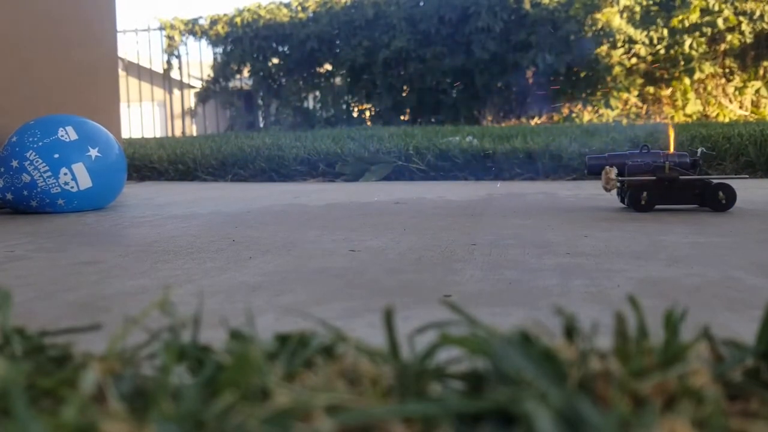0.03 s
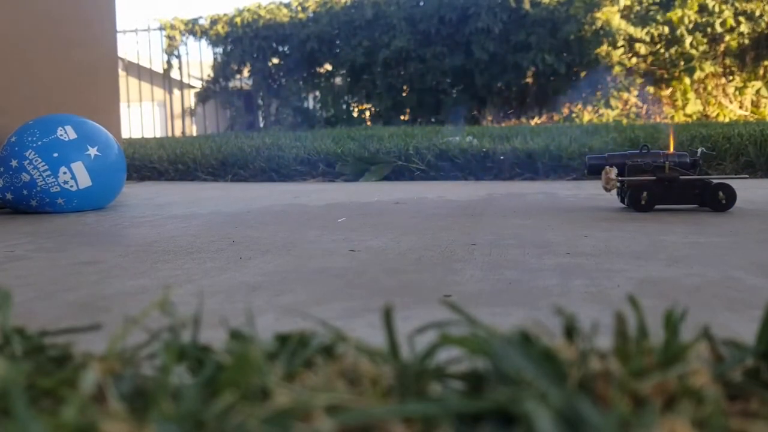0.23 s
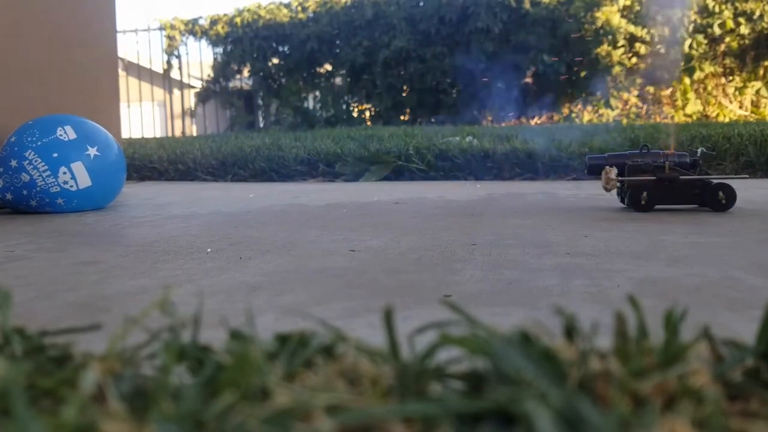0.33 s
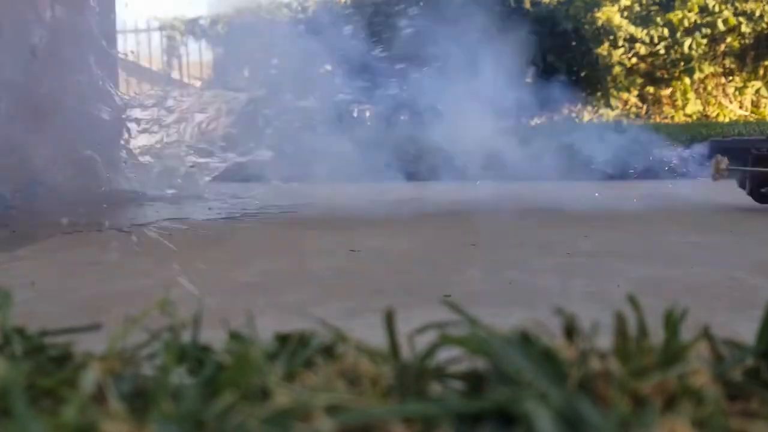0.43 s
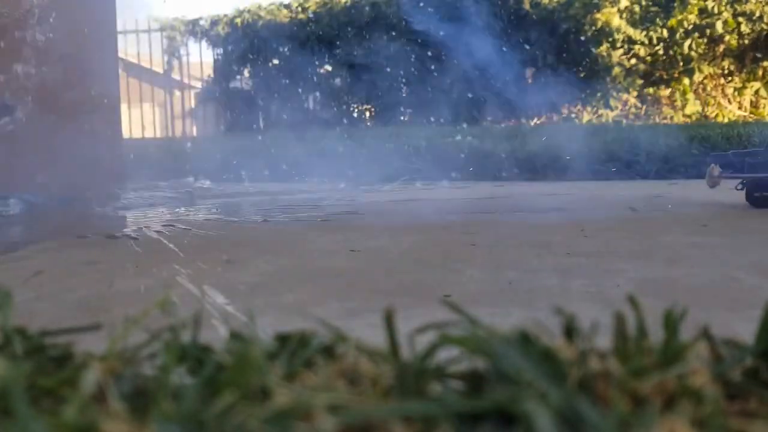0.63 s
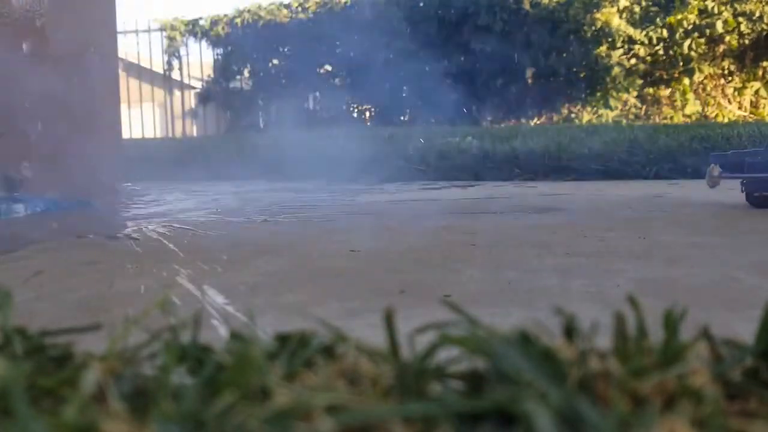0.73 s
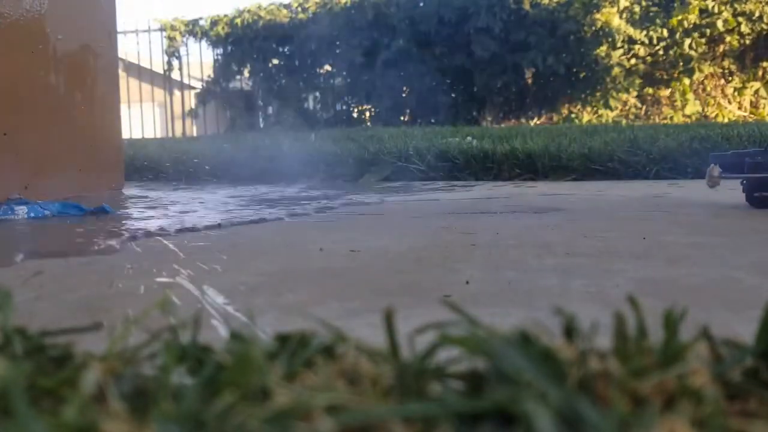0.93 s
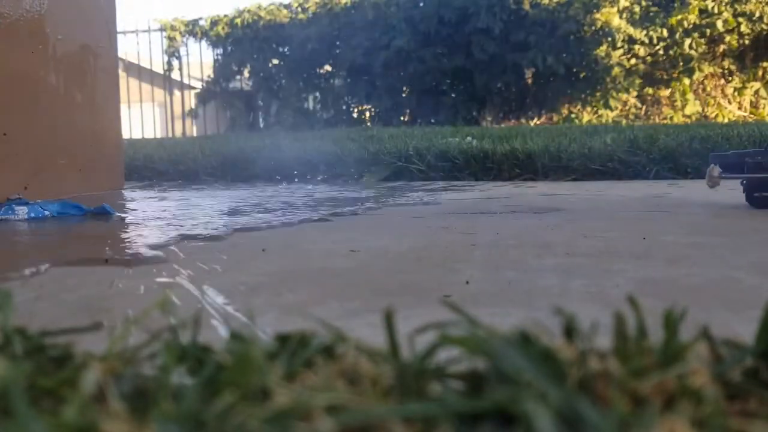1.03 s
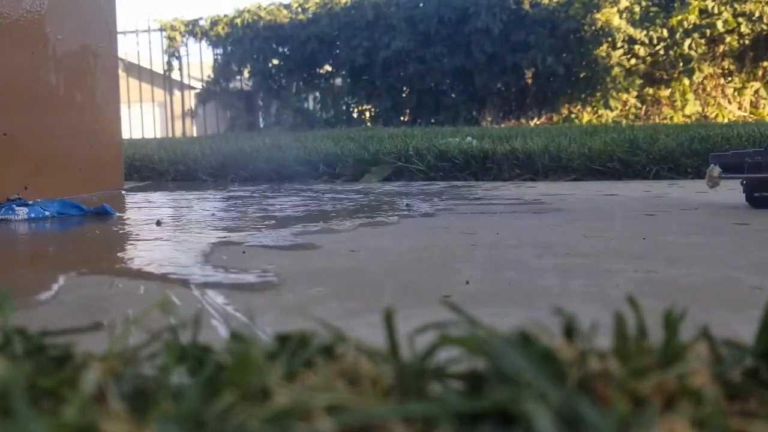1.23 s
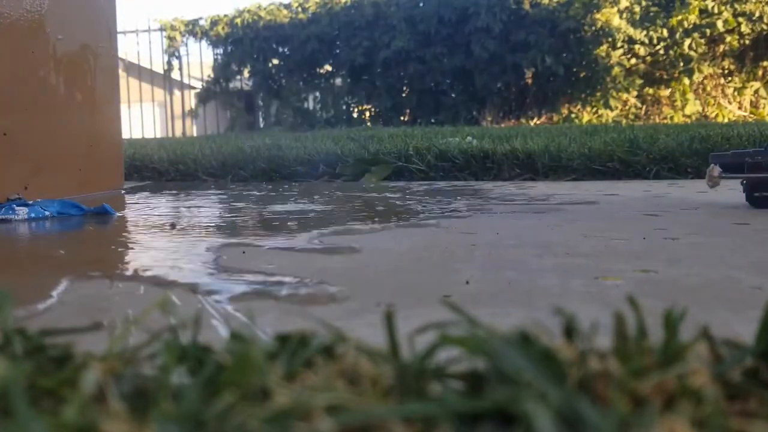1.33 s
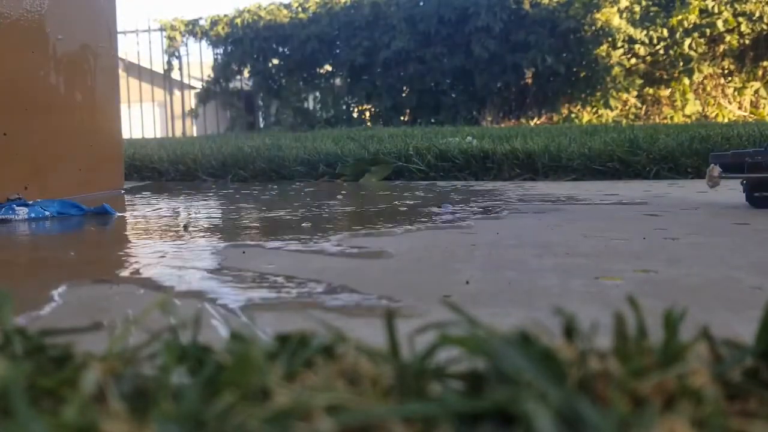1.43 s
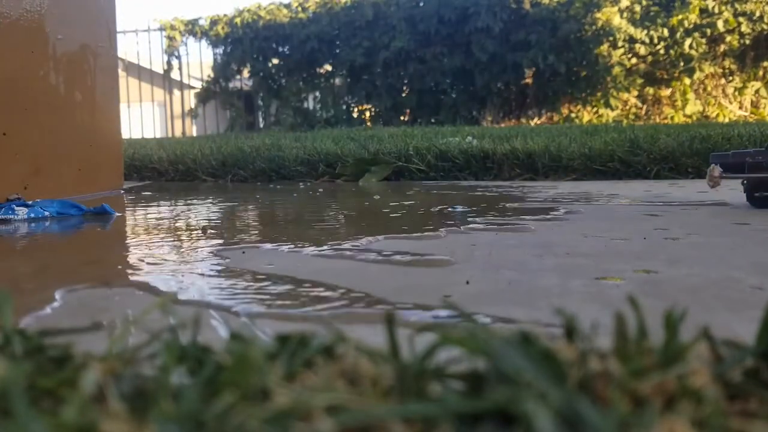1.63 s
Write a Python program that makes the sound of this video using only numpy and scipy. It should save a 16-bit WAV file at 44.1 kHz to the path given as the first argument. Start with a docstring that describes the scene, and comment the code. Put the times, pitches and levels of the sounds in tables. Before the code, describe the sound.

A small cannon bangs outdoors after a brief fuse hiss, then water spatters.

```python
"""A fuse hisses, then a small cannon goes off on a patio with a crack that overloads the microphone.
The shot bursts a water balloon. The yard rings, houses throw the boom back, and it rolls away
while water spatters on the concrete and two drops hit the microphone.
A soft rush with a low tone swells at the end."""
import sys
import numpy as np
from scipy import signal
from scipy.fft import rfft, irfft
from scipy.io import wavfile

SR = 44100
rng = np.random.default_rng(int(sys.argv[2]) if len(sys.argv) > 2 else 0)


def unload_audio(sound):
    """Save the sound as a 16-bit wav file, at the path given as the first command line argument."""
    columns = np.transpose(np.atleast_2d(sound))
    # keep every value between -1 and 1, then stretch to whole-number steps
    steps = np.round(np.clip(columns, -1, 1) * 32767)
    wavfile.write(sys.argv[1], SR, steps.astype(np.int16))


N = 74970
T = np.arange(N) / SR
SHOT_S, LEFT_LAG_S = .2239, .00025
YARD_PAN_DB, FAR_PAN_DB = -0.7, -1.5

# colour of the shot's cracks (frequency [Hz], level [dB])
CRACK_SPECTRUM = [(60, -14), (300, 9), (800, 6), (1500, 4), (2200, -0.5), (3000, 2.5), (4300, -7),
                  (7000, -11.5), (15000, -7.5)]
# colour of the finest droplets and the closing fizz (frequency [Hz], level [dB])
MIST_SPECTRUM = [(2500, -23), (5000, -12), (7500, -13), (10500, 1), (15500, -5.5)]
# stereo image of the yard: centred bass, wide treble (frequency [Hz], left-right correlation)
YARD_STEREO = [(60, .98), (150, .98), (300, .95), (640, .68), (1400, -.05), (3000, .05), (15000, .05)]
# stereo image of air and water (frequency [Hz], left-right correlation)
AIR_STEREO = [(60, .75), (290, 1), (640, 0.74), (1400, 0.0048), (3000, 0.025), (15000, 0.0023)]


def amp(db):
    """Decibels to gain."""
    return 10 ** (np.asarray(db) / 20)


def unit(x):
    """Scales to rms 1."""
    return x / np.sqrt(np.mean(x ** 2) + 1e-20)


def read(points, hz):
    """Reads a table on a log-frequency axis."""
    f, value = np.transpose(points)
    return np.interp(np.log(hz + 1), np.log(f + 1), value)


def pan(db):
    """Left and right gains for a level difference; negative leans right."""
    return amp(np.array([[db], [-db]]) / 2)


def noise(spectrum, stereo, dull_db_per_khz=0):
    """Noise at rms 1 with a given colour and stereo image."""
    hz = np.fft.rfftfreq(N, 1 / SR)
    left, spread = np.exp(2j * np.pi * rng.random((2, len(hz))))
    likeness = np.clip(read(stereo, hz), -1, 1)
    right = likeness * left + np.sqrt(1 - likeness ** 2) * spread
    gain = amp(read(spectrum, hz) - dull_db_per_khz * hz / 1000)
    return unit(irfft(np.array([left, right]) * gain, N))


def wander(rate_hz):
    """Smooth random modulation at rms 1, rolled off above rate_hz."""
    hz = np.fft.rfftfreq(N, 1 / SR)
    return unit(irfft(rfft(rng.standard_normal(N)) * np.exp(-(hz / rate_hz) ** 2), N))


def wavering_tone(hz, rate_hz):
    """A sine whose pitch wavers by about 1.5 percent."""
    pitch = hz * (1 + 0.015 * wander(rate_hz))
    return np.sin(2 * np.pi * np.cumsum(pitch) / SR)


def ramp(start, rise):
    """Linear attack from 0 to 1."""
    return np.clip((T - start) / rise, 0, 1)


def fade(start, t60):
    """Holds until start, then falls 60 dB every t60 seconds."""
    return 10 ** (-3 * np.maximum(T - start, 0) / t60)


def die_away(x, start, t60s):
    """Lets each band decay at its own speed."""
    hz, spectrum = np.fft.rfftfreq(N, 1 / SR), rfft(x)
    centres, times = np.transpose(t60s)
    bands = (irfft(spectrum * read(np.c_[centres, solo], hz), N) for solo in np.eye(len(times)))
    return sum(band * fade(start, t60) for band, t60 in zip(bands, times))


def outdoor_air():
    """A quiet, steady bed of open air."""
    # colour of the air (frequency [Hz], level [dB])
    colour = [(20, -35.5), (92, -1.5), (200, -23), (516, -24.5), (659, -28), (1190, -23.5), (1740, -37.5),
              (2000, -37.5), (3080, -53.5), (10100, -51.5), (16000, -64.5)]
    return pan(-5) * amp(-61.5) * noise(colour, AIR_STEREO)


def closing_rush():
    """A soft rush swells with a faint whistle in it, joined by a low tone and a fizz."""
    # colour of the rush (frequency [Hz], level [dB])
    colour = [(60, -29.5), (110, -11), (230, -10.5), (380, -12), (600, -10.5), (1090, -14), (1500, -26),
              (2200, -36.5), (4000, -42.5), (8000, -56)]
    # its swell (time [s], level [dB])
    swell = [(1.3, -78), (1.44, -64), (1.53, -60.5), (1.6, -53.5), (1.645, -52.5), (1.7, -56.5)]
    envelope = amp(np.interp(T, *np.transpose(swell))) * ramp(swell[0][0], rise=0.043)
    whistle = amp(-11.5) * wavering_tone(1080, rate_hz=81)
    rush = (noise(colour, AIR_STEREO) + whistle) * envelope
    tone = amp(-51) * ramp(1.599, rise=0.021) * wavering_tone(232, rate_hz=30.3)
    fizz = amp(-69.5) * noise(MIST_SPECTRUM, AIR_STEREO) * np.exp(-((T - 1.625) / 0.07) ** 2)
    return pan(FAR_PAN_DB) * (rush + tone + fizz)


def spray():
    """The burst balloon's grainy spray settles, then its finest droplets."""
    # colour of the spray (frequency [Hz], level [dB])
    colour = [(600, -5), (1200, -10.5), (2000, -16), (4600, -13.5), (7600, -33.5), (10000, -24),
              (16000, -26.5)]
    # its decay by band (frequency [Hz], t60 [s])
    decays = [(600, 1.64), (1500, 1.4), (4000, 0.9), (9000, 0.88), (15000, 1.34)]
    spray_s, mist_s, rise_s, hold_s = 0.36, 0.42, 0.013, 0.077
    wash = die_away(noise(colour, AIR_STEREO), spray_s + hold_s, decays) * ramp(spray_s, rise_s)
    wash *= amp(-47.5 + 3 * wander(rate_hz=404))  # fast level flicker makes the grain
    mist = noise(MIST_SPECTRUM, AIR_STEREO) * ramp(mist_s, rise_s) * fade(mist_s, t60=2.8)
    mist *= amp(-78 + 5 * wander(rate_hz=700))
    return pan(FAR_PAN_DB) * (wash + mist)


def droplets():
    """Single droplets land with a crisp ping a few cycles long."""
    # landings (time [s], level [dB], pitch [Hz])
    landings = [(.5877, -45, 4660), (.595, -57, 10500), (.631, -49.5, 4870), (0.6336, -52, 4900),
                (0.6544, -50, 4900), (.6588, -44, 4600)]
    width_s = 0.00045
    pings = sum(amp(db) * np.exp(-((T - s) / width_s) ** 2) * np.sin(2 * np.pi * hz * (T - s))
                for s, db, hz in landings)
    return pan(-6) * pings


def mic_drops():
    """A drop strikes one microphone port: a sudden step of pressure that swings back once."""
    # hits (time [s], level [dB], side [1 left, -1 right])
    hits = [(0.9068, -40, 1), (1.1441, -35.5, -1)]
    swing_hz, decay_s = 149.8, 0.003
    out = np.zeros((2, N))
    for s, db, side in hits:
        age = np.maximum(T - s, 0)
        envelope = ramp(s, rise=.00009) * np.exp(-age / decay_s)
        out[int(side < 0)] -= amp(db) * envelope * np.cos(2 * np.pi * swing_hz * age)
    return out


def splats():
    """Large drops and scraps slap the concrete, each with a broad ring of its own."""
    # slaps (time [s], body [dB], ring [dB], ring pitch [Hz], splash [dB], decay [s], pan [dB])
    slaps = [(0.383, -27.5, -41, 1100, -62, 0.003, -10), (0.4154, -46, -55, 4830, -34.5, 0.004, 1),
             (0.489, -56, -45, 4150, -48.5, 0.0032, 0), (0.526, -35, -54, 1300, -63, 0.0082, -6.5),
             (0.6133, -62, -60.5, 3950, -44.5, 0.0012, -2), (0.6305, -42, -57, 4800, -61.5, 0.012, -4),
             (0.678, -41.5, -56.5, 1620, -67, 0.0079, -3), (0.7187, -48, -54, 4530, -55, 0.0025, -3),
             (0.7492, -34, -45.5, 2650, -69, 0.0033, -2.5), (0.8102, -58.5, -64.5, 4400, -69.5, 0.0022, -5),
             (1.067, -54.5, -56, 1480, -77, 0.0079, -5), (1.238, -68, -69, 2264, -78.5, 0.0073, -2)]
    # colour of the low body (frequency [Hz], level [dB])
    body_colour = [(100, -13), (450, 6), (1300, -2.5), (2300, -14.5), (5000, -50)]
    # colour of the bright splash (frequency [Hz], level [dB])
    splash_colour = [(2000, -32), (5000, 7), (7500, -8), (9500, 8.5), (15500, -3)]
    body, splash = noise(body_colour, AIR_STEREO), noise(splash_colour, AIR_STEREO)
    steps = np.arange(-6, 7)
    out = np.zeros((2, N))
    for s, body_db, ring_db, hz, splash_db, decay, pan_db in slaps:
        peak = np.c_[hz * np.exp(0.31 * steps), -17 * abs(steps)]  # skirts fall 17 dB a step
        ring = noise(peak, AIR_STEREO)
        strike = ramp(s, rise=0.00038) * np.exp(-np.maximum(T - s, 0) / decay)
        slap = amp(body_db) * body + amp(ring_db) * ring + amp(splash_db) * splash
        out += pan(pan_db) * strike * slap
    return out


def fuse():
    """The fuse hisses, and its flame buffets just before the charge catches."""
    # colour of the hiss (frequency [Hz], level [dB])
    hiss_colour = [(35, -13.5), (105, 1), (300, -12), (700, -14), (1200, -20.5), (2200, -37), (3400, -23),
                   (4400, -27.5), (5100, -39.5), (7000, -36), (9500, -26.5), (11400, -26.5), (12600, -14.5),
                   (15600, -16.5)]
    # colour of the buffeting flame (frequency [Hz], level [dB])
    flame_colour = [(30, -16.5), (70, -3), (115, 3), (250, -11), (600, -28.5), (2000, -63.5)]
    # stereo image of both (frequency [Hz], left-right correlation)
    stereo = [(60, 0), (300, .4), (640, -0.16), (1400, 0.51), (15000, 0)]
    hiss = amp(-38.5 + 1.22 * wander(rate_hz=380)) * noise(hiss_colour, stereo)
    flame = amp(-46) * noise(flame_colour, stereo) * ramp(0, rise=0.12) ** 2
    return pan(-1.5) * (hiss + flame) * fade(SHOT_S, t60=0.049)


def rolling_boom():
    """The boom returns from farther away, duller and more to the right each time, over a low grumble."""
    # colour of the grumble (frequency [Hz], level [dB])
    grumble_colour = [(25, -29.5), (60, -7.5), (130, -1.5), (190, -2), (300, -12), (900, -51)]
    # colour of the boom (frequency [Hz], level [dB])
    boom_colour = [(30, -31.5), (70, -24), (120, -7), (180, 1), (330, -6), (500, -8.5), (800, -23),
                   (2000, -28.5), (6000, -52)]
    # diffuse returns from houses and trees (time [s], level [dB], rise [s], t60 [s])
    returns = [(0.415, -27, 0.0056, 0.51), (0.473, -28, 0.0077, 0.36), (0.645, -41, 0.022, 0.29),
               (.867, -52, .015, 0.41)]
    grumble_s, dulling_db_per_khz_s, drift_db_per_s = .28, 64, -8
    envelope = ramp(grumble_s, rise=0.074) * fade(grumble_s, t60=2.34)
    grumble = noise(grumble_colour, YARD_STEREO) * amp(-42.5 + 0.5 * wander(rate_hz=17))
    out = pan(FAR_PAN_DB) * grumble * envelope
    for s, db, rise, t60 in returns:
        later = s - returns[0][0]
        boom = noise(boom_colour, YARD_STEREO, dulling_db_per_khz_s * later)
        out += pan(drift_db_per_s * later) * amp(db) * boom * ramp(s, rise) * fade(s + rise, t60)
    return out


def wall_echoes():
    """Flat walls return the blast as a rounded push, pull and push."""
    # reflections from walls near and far (time [s], level [dB], pulse width [s])
    reflections = [(0.2363, -7, 0.00068), (0.2409, -9.5, 0.00065), (0.2442, -7.5, .0007),
                   (0.2508, -8, 0.00058), (0.2545, -8.5, .0006), (0.2618, -8.5, 0.00065),
                   (0.2698, -2.5, 0.00037), (0.2796, -8, 0.0006), (0.306, -10.5, 0.0013),
                   (0.3189, -15.5, 0.00071), (0.339, -17, 0.00069), (.425, -13, 0.00078),
                   (0.4312, -17.5, 0.00083), (0.4526, -17, 0.00088), (0.4584, -17.5, 0.00089),
                   (0.4643, -19, 0.0012), (0.4859, -26, 0.0017), (0.4936, -25, 0.0011),
                   (0.5048, -21.5, 0.00072), (.5128, -23.5, 0.00057), (0.5644, -30, 0.00077),
                   (.596, -32.5, 0.00093), (0.6942, -34.5, 0.0011), (0.8902, -39.5, 0.0014),
                   (0.8952, -43, 0.0016), (0.9776, -48.5, .0018), (1.0081, -42, 0.0017),
                   (1.061, -46.5, .002), (1.085, -46.5, 0.0018), (1.112, -49.5, .0017),
                   (1.296, -53, 0.0019)]
    channel_lag = np.array([[LEFT_LAG_S], [-LEFT_LAG_S]]) / 2
    out = np.zeros((2, N))
    for s, db, width in reflections:
        offset = (T - s - channel_lag) / width
        out += amp(db) * (offset ** 2 - 1) * np.exp(-offset ** 2 / 2)
    return pan(YARD_PAN_DB) * out


def yard():
    """Dense reflections from ground, wall and hedge, with a few ringing tones."""
    # colour of the reverb at its start (frequency [Hz], level [dB])
    colour = [(30, -21), (110, -10.5), (180, -7.5), (300, -4.5), (450, -4), (700, -9.5), (1200, -15.5),
              (1900, -21), (3000, -22.5), (5300, -22.5), (7400, -34), (10000, -28.5), (16000, -33.5)]
    # its decay by band (frequency [Hz], t60 [s])
    decays = [(50, 0.15), (180, .5), (400, 0.31), (750, 0.22), (2500, 0.31), (6000, .26), (14000, 0.23)]
    # air ringing between patio and walls (frequency [Hz], level [dB], t60 [s])
    modes = [(198.5, -17.5, 0.42), (285.5, -14, 0.26), (454, -18.5, 0.38), (585, -20.5, .16),
             (690, -13.5, 0.12), (913, -24, 0.31), (1043, -24.5, 0.24), (1237, -28.5, 0.15),
             (1494, -33, 0.32), (2960, -35.5, 0.28)]
    start_s, hold_s = .235, 0.041
    wash = amp(-14.5) * die_away(noise(colour, YARD_STEREO), start_s + hold_s, decays)
    rings = sum(amp(db) * np.sin(2 * np.pi * hz * (T - start_s)) * fade(start_s, t60)
                for hz, db, t60 in modes)
    return pan(YARD_PAN_DB) * (wash + rings) * ramp(start_s, rise=0.0023)


def balloon_snaps():
    """Sharp secondary cracks follow the shot as the balloon bursts."""
    # cracks (time [s], level [dB])
    cracks = [(.2367, -13), (.2435, -15.5), (.2703, -13.5)]
    width_s = 0.0013
    spikes = sum(amp(db) * np.exp(-abs(T - s) / width_s) for s, db in cracks)
    return noise(CRACK_SPECTRUM, YARD_STEREO) * spikes


def cannon_shot():
    """A violent crack and barrel ring, then the push, suction and deep thump of the blast wave."""
    # stereo image of the crack (frequency [Hz], left-right correlation)
    stereo = [(60, .98), (800, .95), (2500, .6), (15000, .2)]
    crack_s, barrel_hz = 0.0035, 716.6
    blast_at_s, push_s, thump_hz = .2272, 0.0026, 40.08
    gate = ramp(SHOT_S, rise=.0002) * np.exp(-np.maximum(T - SHOT_S - crack_s, 0) / .0002)
    barrel = amp(-4.5) * np.cos(2 * np.pi * barrel_hz * (T - SHOT_S))  # gas ringing in the bore
    crack = (amp(3) * noise(CRACK_SPECTRUM, stereo) + barrel) * gate
    age = np.maximum(T - blast_at_s, 0)
    progress = age / push_s  # push turns to suction at 1
    blast = amp(-6) * np.minimum(progress * 10, 1) * (1 - progress) * np.exp(-progress)
    thump = amp(-23.5) * np.sin(2 * np.pi * thump_hz * age) * fade(blast_at_s, t60=0.088)
    left, right = crack + blast - thump
    return np.array([np.roll(left, round(LEFT_LAG_S * SR)), right])


def scene():
    """Everything that reaches the microphone."""
    firing = fuse() + cannon_shot() + balloon_snaps()
    tail = yard() + wall_echoes() + rolling_boom()
    water = spray() + splats() + droplets() + mic_drops()
    return firing + tail + water + closing_rush() + outdoor_air()


def record(dry):
    """Microphone overload flattens the shot; a low-pass then trims the top end."""
    ceiling, knee, cutoff_hz = .9, 4, 16200
    clipped = dry / (1 + abs(dry / ceiling) ** knee) ** (1 / knee)
    lowpass = signal.firwin(301, cutoff_hz, window=("kaiser", 8), fs=SR)
    return signal.oaconvolve(clipped, lowpass[None], "same")


dry = scene()
out = record(dry)
unload_audio(out)
```